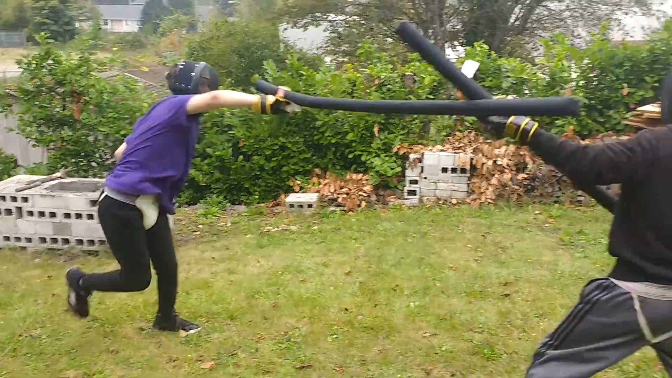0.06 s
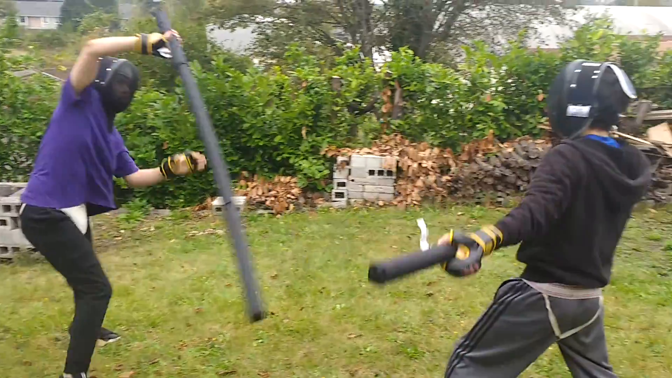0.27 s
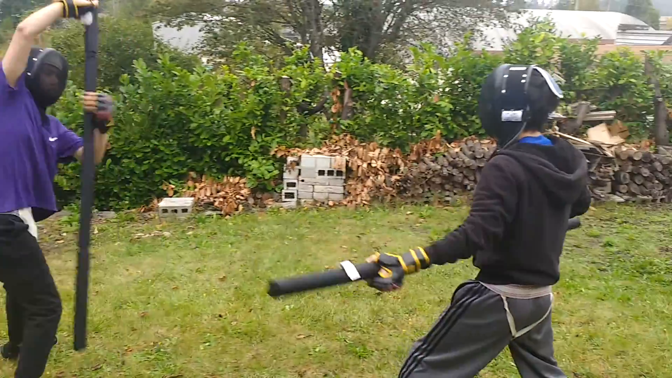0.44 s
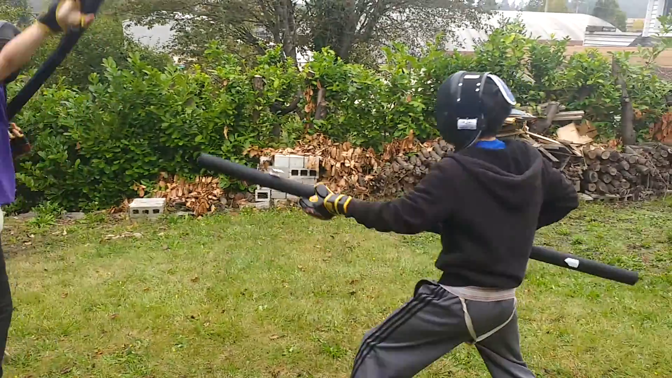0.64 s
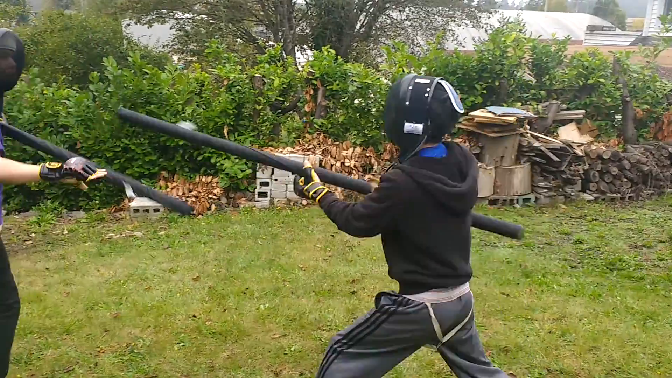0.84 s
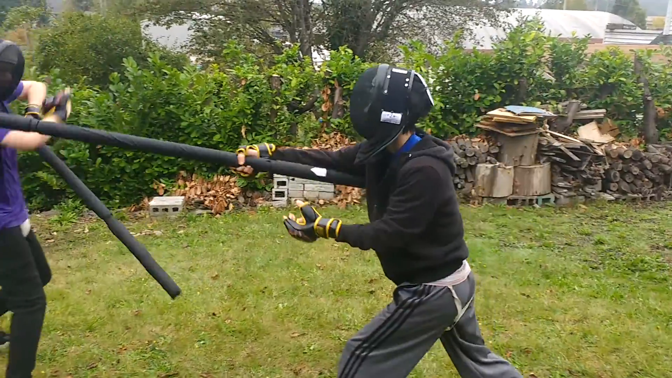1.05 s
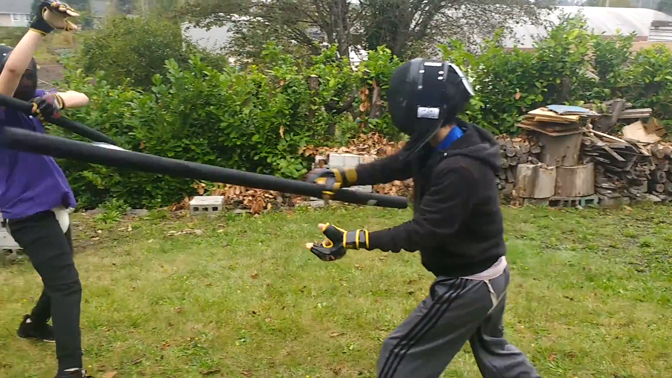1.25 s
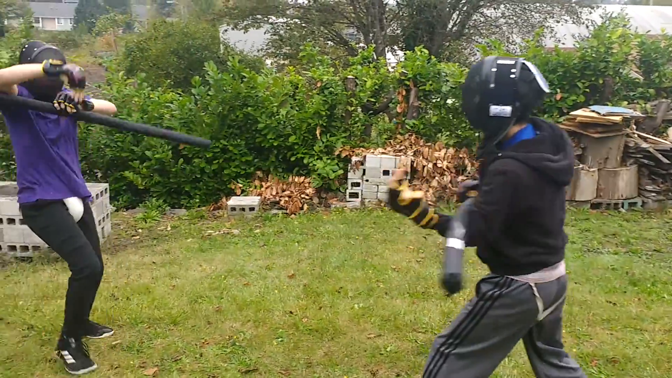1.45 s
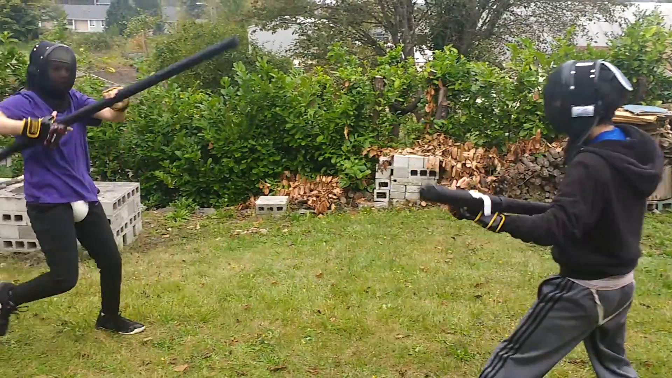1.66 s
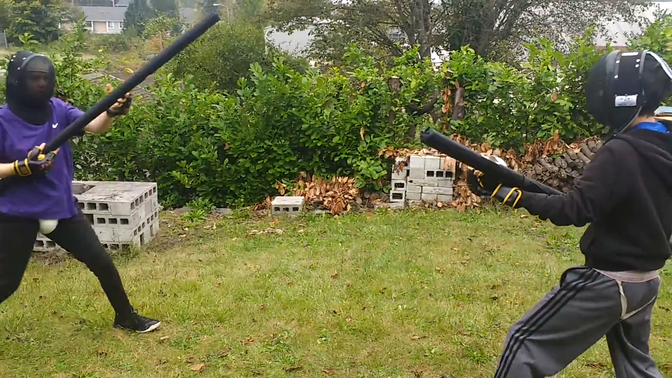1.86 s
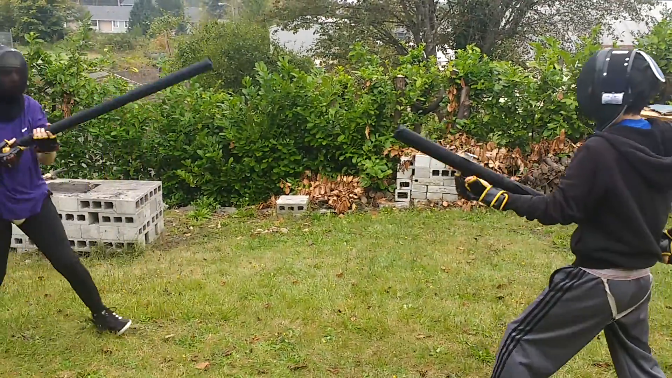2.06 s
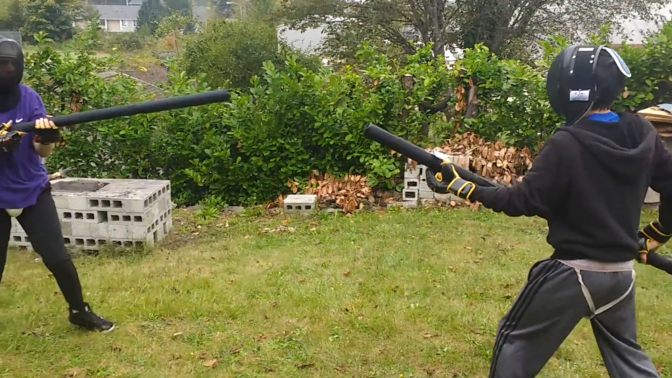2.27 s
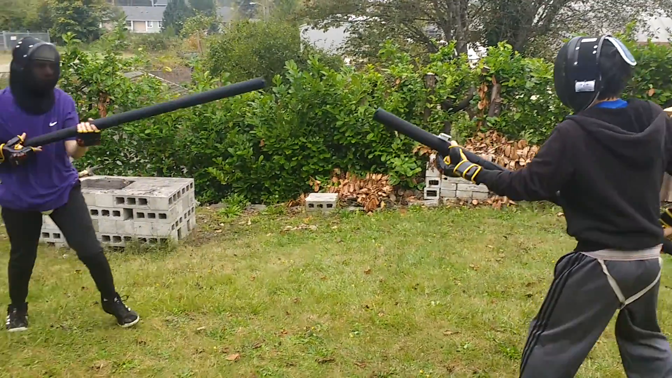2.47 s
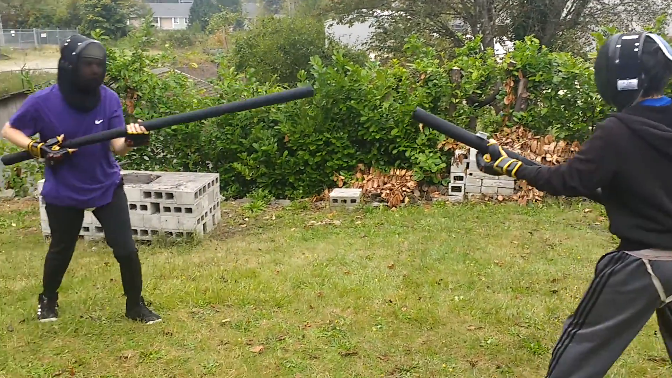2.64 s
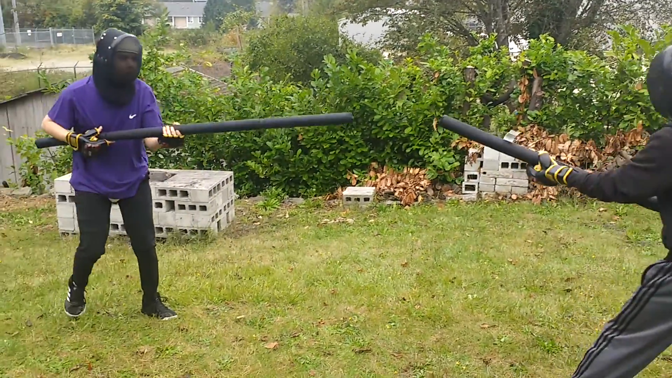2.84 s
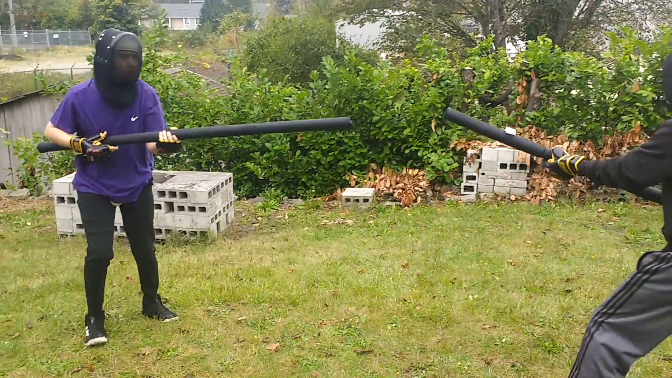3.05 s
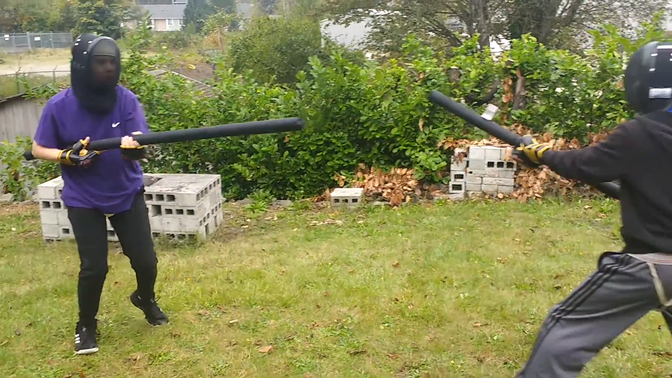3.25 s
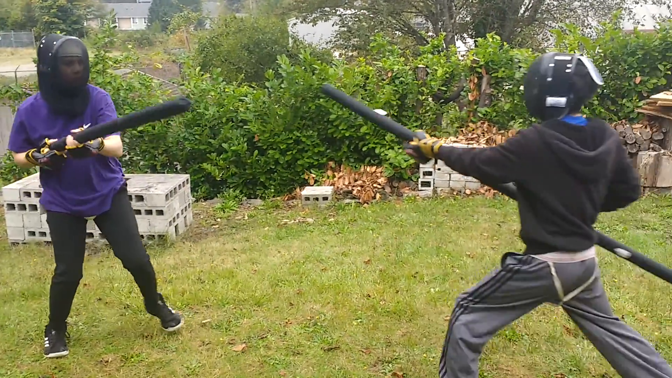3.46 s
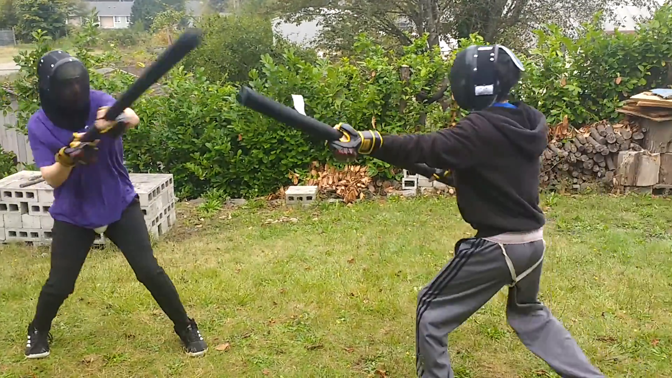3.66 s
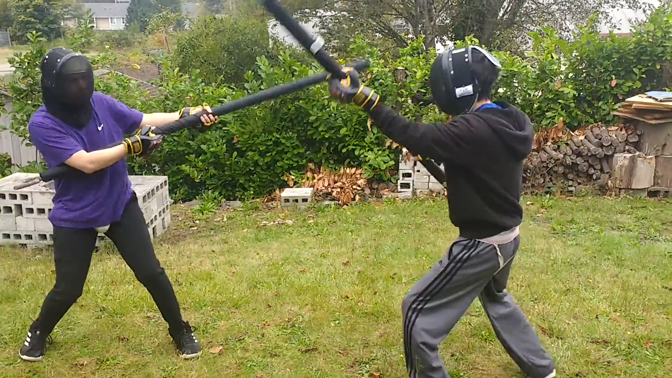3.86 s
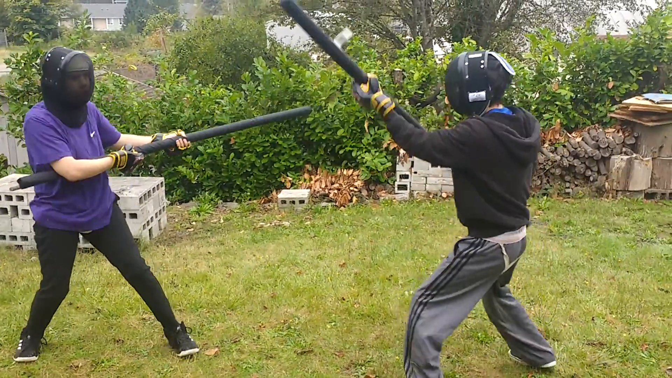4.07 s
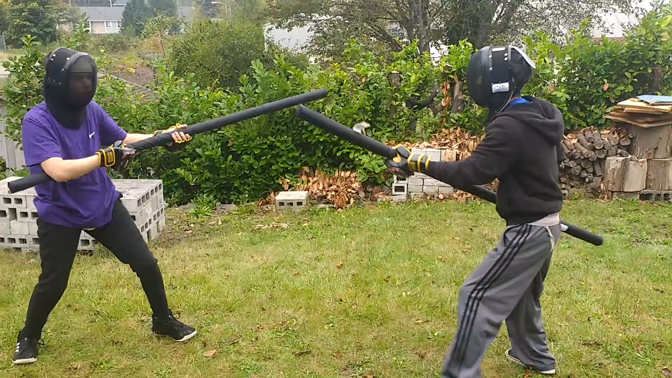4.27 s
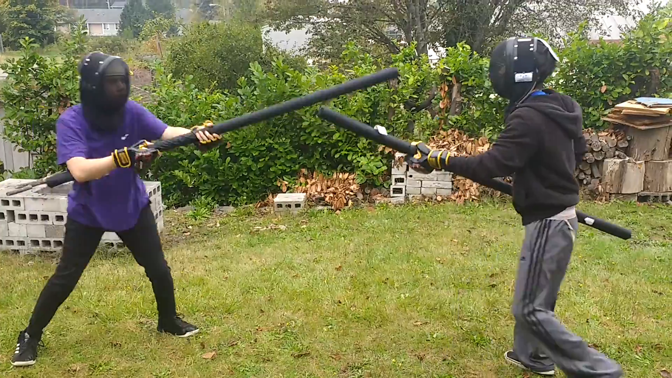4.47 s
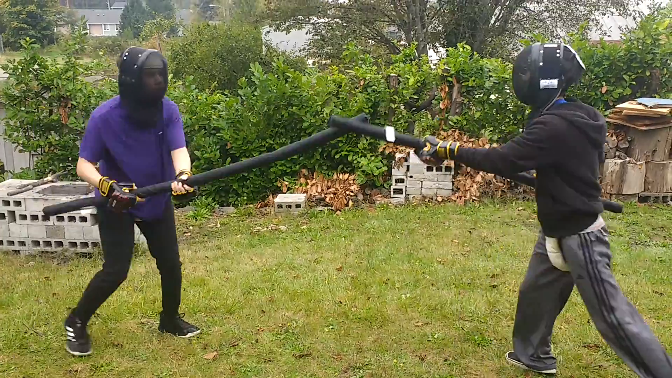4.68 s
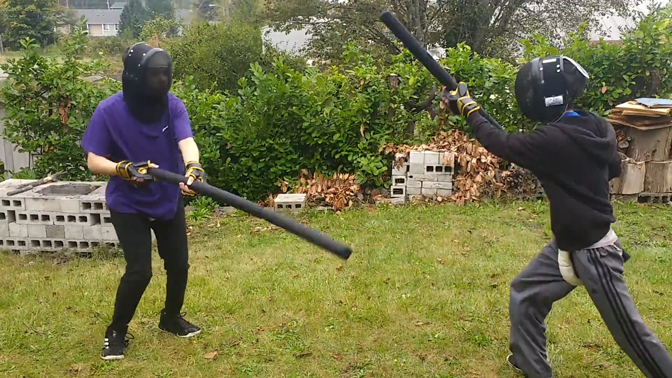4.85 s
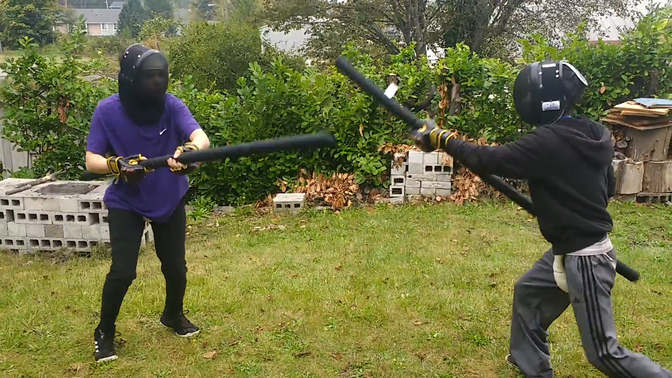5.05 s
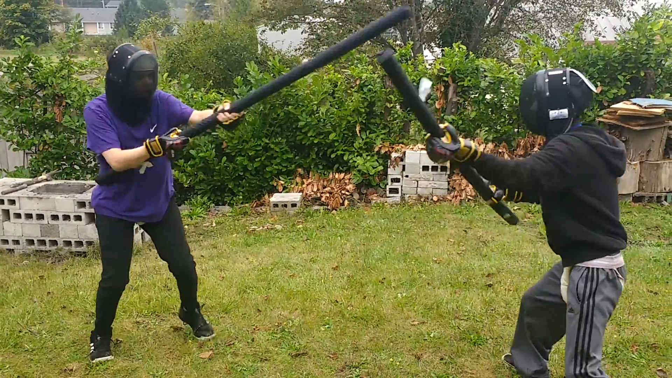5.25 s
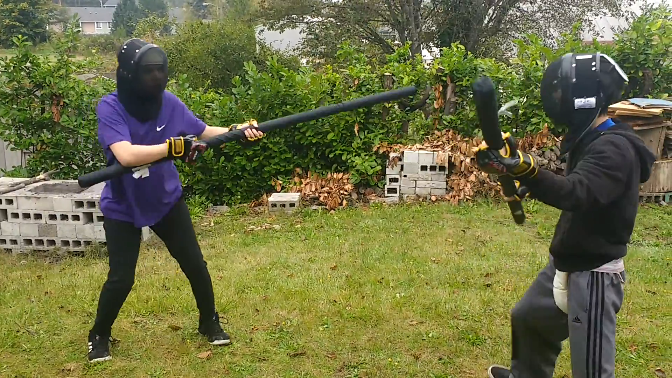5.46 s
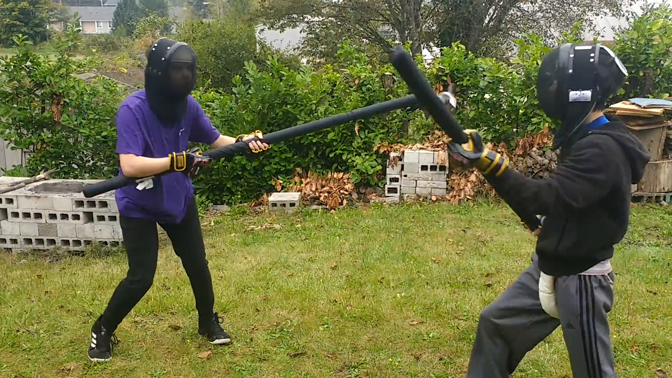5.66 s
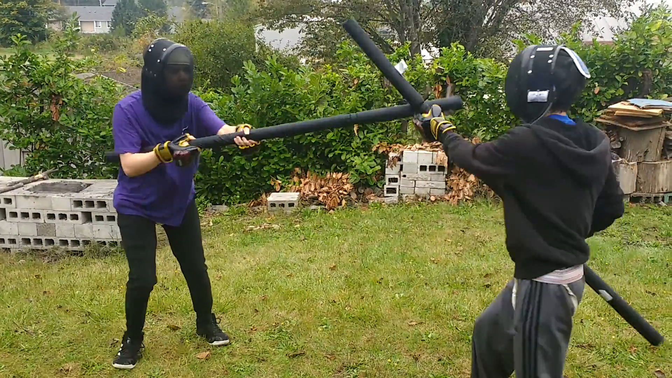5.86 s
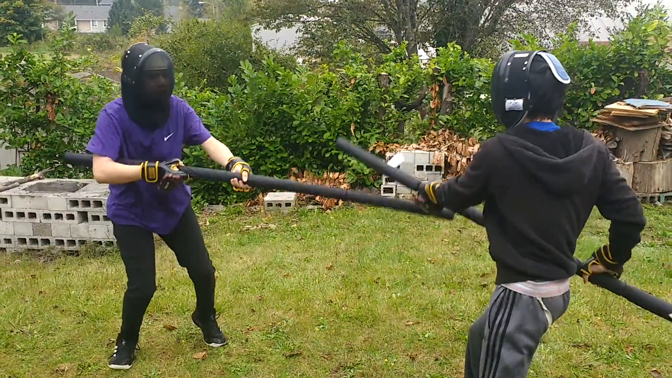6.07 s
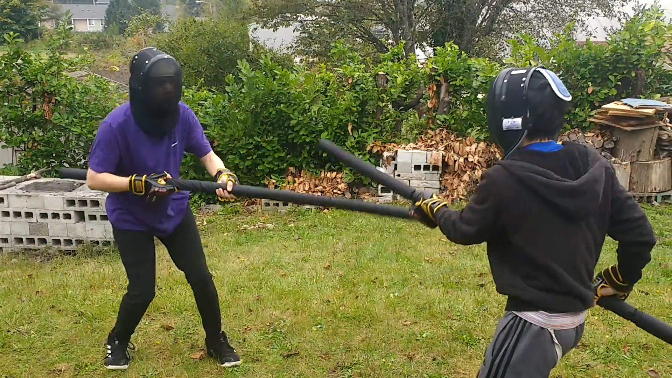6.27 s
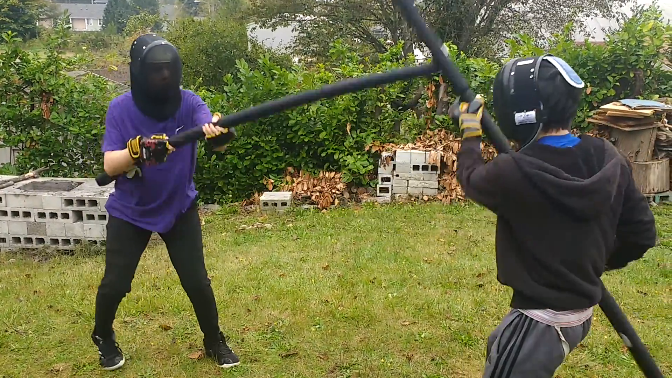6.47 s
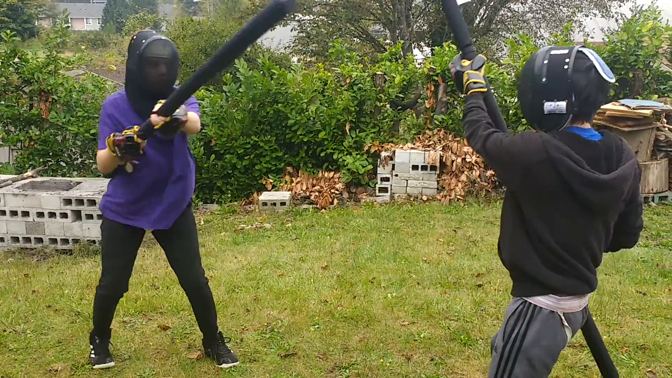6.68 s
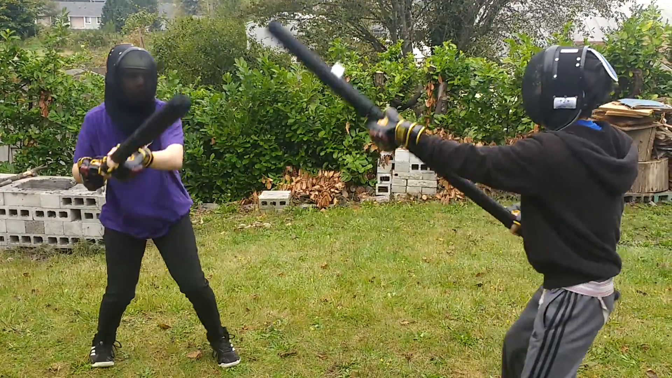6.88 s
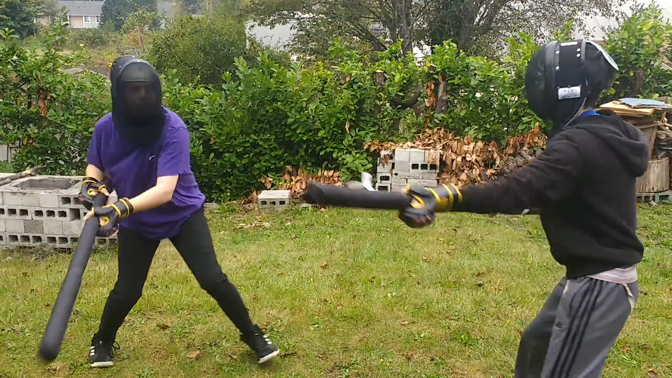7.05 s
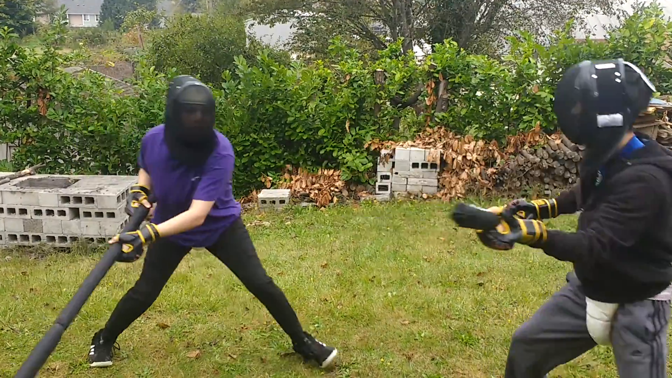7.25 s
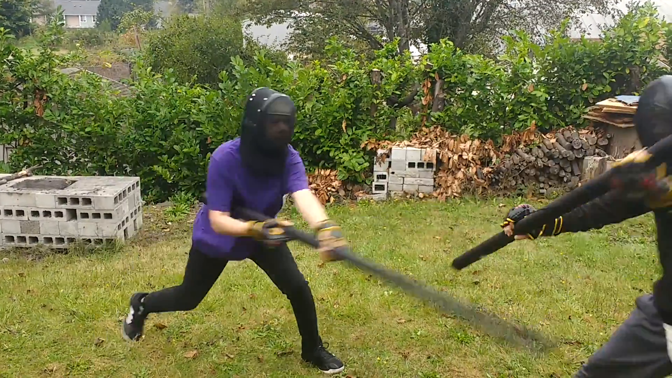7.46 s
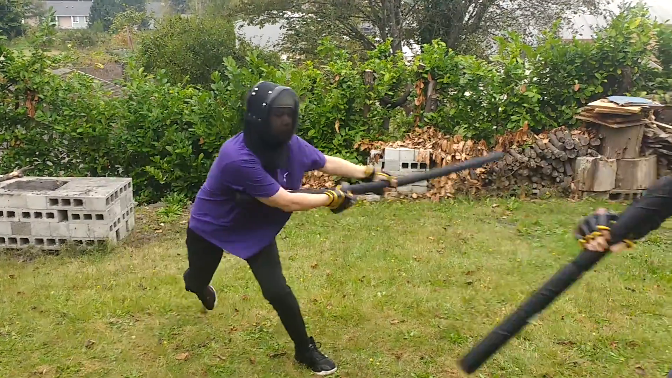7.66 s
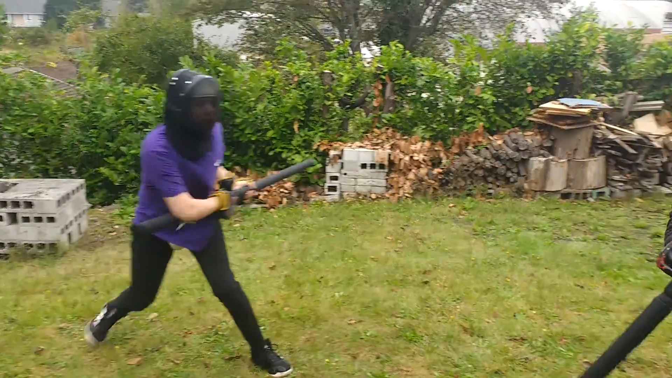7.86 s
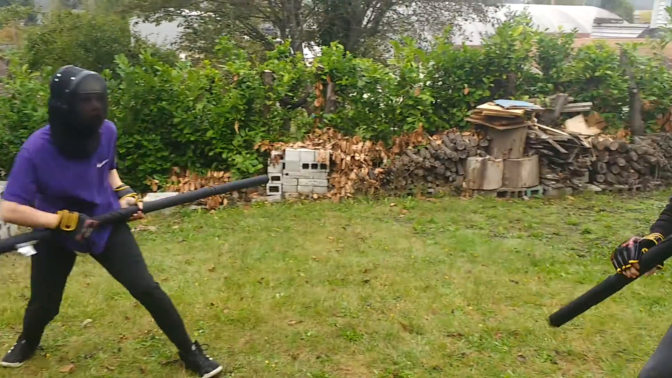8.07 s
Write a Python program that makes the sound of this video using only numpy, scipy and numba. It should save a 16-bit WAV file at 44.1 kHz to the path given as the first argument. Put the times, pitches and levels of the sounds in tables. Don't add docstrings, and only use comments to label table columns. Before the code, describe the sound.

A backyard bout with foam-padded poles, picked up by a phone a few metres away, with wide stereo and thin bass. Soft airy rubbing and rustling opens over a steady far-traffic roar; a faint wheezy bird calls at 0.6-0.9 s. A dull thud lands at 1.0 with a low foam squeak, then a harder knock at 1.2, after which the background dips and slowly returns. Tiny soft foam whoops come near 2.1 and 2.3. Bright tape and glove ticks cluster at 2.7-3.0, with sparser ones until 3.9. The bird calls most clearly at 4.2-4.5. Knocks follow at 4.6 and 5.2, then a loud deep double thud at 5.9. The bird answers at 6.0-6.3, weaker knocks fall at 6.45-6.65, cloth swishes, and the loudest ringing crack hits at 7.6, again ducking the background. Small taps fade out by 8 s.

```python
import sys
import numpy as np
from scipy import signal
from scipy.fft import rfft, irfft, next_fast_len
from scipy.io import wavfile
from scipy.ndimage import uniform_filter1d
from numba import njit

SR = 44100
rng = np.random.default_rng(int(sys.argv[2]) if len(sys.argv) > 2 else 0)


def linear_from_db(decibels):
    return 10 ** (np.asarray(decibels, float) / 20)


def log_audio(samples):
    frames = np.atleast_2d(samples).T
    limited = np.clip(frames, -1, 1)
    pcm = np.round(limited * 32767).astype(np.int16)
    wavfile.write(sys.argv[1], SR, pcm)


N = 358091
STEP = 32
TIME = np.arange(N // STEP + 1) * STEP / SR
SAMPLE_TIME = np.arange(N) / SR


@njit
def svf(x, hz, width):
    y, b, l = np.empty(len(x)), 0., 0.
    g, k = np.tan(np.pi * hz / SR), width / hz
    for i in range(len(x)):
        v = (b + g * (x[i] - l)) / (1 + g * (g + k))
        b, l, y[i] = 2 * v - b, l + 2 * g * v, k * v
    return y


def band(x, hz, width_hz):
    return svf(svf(x, 1. * hz, 1. * width_hz), 1. * hz, 1. * width_hz)


def unit(x):
    return x / np.sqrt(np.mean(x ** 2))


def on_log(hz, table):
    table_hz, values = np.transpose(table)
    return np.interp(np.log(hz), np.log(table_hz), values)


def curves(table):
    s, *columns = np.transpose(table)
    return [np.interp(TIME, s, c) for c in columns]


def full(control):
    return np.interp(SAMPLE_TIME, TIME, control)


def walk(rate):
    k = int(SR / STEP / rate)
    held = np.repeat(rng.standard_normal(len(TIME) // k + 1), k)
    return 1.3 * uniform_filter1d(uniform_filter1d(held, k), k)[:len(TIME)]


def seconds(length):
    return np.arange(int(length * SR)) / SR


def add(out, x, s):
    i = int(s * SR)
    out[:, i:i + x.shape[-1]] += x[..., :N - i]


# frequency in Hz, likeness from 0 to 1.
CHANNEL_LIKENESS = [(40, 0), (130, 0.58), (260, 0.58), (450, 0.21), (1000, 1), (1550, 0.67), (2050, 0.96),
                    (2700, 0.99), (3600, 1), (12000, 0.99)]


def pair(noise, hz, width_hz, db, count=0):
    alike = np.clip(on_log(hz, CHANNEL_LIKENESS), 0, 1)
    mid = np.sqrt(1 + alike) * band(noise[-count % 3], hz, width_hz)
    side = 0 * mid
    if alike < 1:
        side = np.sqrt(1 - alike) * band(noise[(1 - count) % 3], hz, width_hz)
    return np.array([mid + side, mid - side]) * (full(linear_from_db(db)) / np.sqrt(np.mean(mid ** 2 + side ** 2)))


# start in seconds, peak in dB, thud pitch in Hz, crack in dB over the knock,
# thud in dB over the pole's ring.
BLOWS = [(1.0231, -21, 297, -20, 15), (1.033, -18.5, 790, 1.5, -3), (1.233, -14.5, 254, -3.5, -0.5),
         (4.606, -13.5, 232, -5, -1), (4.6108, -22, 345, -22, -0.5), (5.2183, -17.5, 224, -9, -2),
         (5.9272, -9.5, 253, -15, 11), (5.9304, -7.5, 737, -12.5, 2), (6.4561, -21, 258, -11, -1.5),
         (6.5551, -24.5, 740, -6, -1), (7.5747, -5, 340, -8.5, -5), (7.6021, -24.5, 440, -9, -4),
         (7.709, -34.5, 367, -9, 3), (7.985, -39, 835, -27, 2), (6.634, -22.5, 343, -26, 9)]
# frequency in Hz, level in dB, 60 dB decay in seconds.
POLE_MODES = [(160.7, -14.5, 0.14), (363, -8, 0.12), (530, -7.5, 0.062), (734, -0.5, 0.038),
              (851, 4.5, 0.022), (1176, -3, 0.026), (1430, -8, 0.024), (2330, -1, 0.014), (2710, -7, 0.015)]


def knocks():
    out, t = np.zeros((2, N)), seconds(.12)
    modes_hz, modes_db, t60 = np.transpose(POLE_MODES)
    for s, peak_db, thud_hz, crack_db, thud_db in BLOWS:
        hz = modes_hz * (1 + 0.056 * rng.standard_normal(len(modes_hz)))
        gain = linear_from_db(modes_db + 3.2 * rng.standard_normal((2, len(hz))))
        ring = -gain @ (np.sin(2 * np.pi * hz[:, None] * t) * 1000 ** (-t / t60[:, None]))

        squash = 0.72 * np.exp(-(t * thud_hz / 1.18) ** 2) + 0.36 * np.exp(-t / 0.0067)
        thud = np.sin(2 * np.pi * thud_hz * t - .9) * squash
        thud_gain = linear_from_db(thud_db + np.array([[1.5], [-2.5]]))
        body = (ring / np.abs(ring).max() + thud_gain * thud) * (1 - np.exp(-t / 0.00024))

        crack = band(rng.standard_normal(len(t)), 2500, 10200)
        crack = crack * (2.4 * np.exp(-t / 0.0011) + 0.23 * np.exp(-t / 0.0026))

        bumps = np.repeat(rng.standard_normal(len(t) // 150 + 1), 150)[:len(t)]
        grit = rng.standard_normal(len(t)) * linear_from_db(2.5 * bumps)
        slide = unit(band(grit, 530, 3100)) * (t / .022) ** 0.99 * np.exp(1.5 - t / 0.013)

        blow = body / np.abs(body).max() + linear_from_db(crack_db - 6.0) * crack + linear_from_db(-29) * slide
        add(out, blow * linear_from_db(peak_db + 0.5), s)
    return signal.sosfilt(signal.butter(2, 110, "high", fs=SR, output="sos"), out)


# start in seconds, peak in dB, centre in Hz.
TOUCHES = [(0.5207, -46, 3020), (1.854, -33.5, 2810), (2.7274, -27, 3230), (2.7366, -33.5, 4430),
           (2.7416, -35, 4480), (2.7538, -28, 4660), (2.9472, -37, 2550), (2.97, -19.5, 2560),
           (2.9883, -16, 2500), (3.0024, -35, 2500), (3.0102, -23, 2720), (3.222, -26.5, 4630),
           (3.462, -30.5, 4860), (3.5525, -38.5, 4170), (3.8811, -33, 2800), (3.936, -28, 5630),
           (4.7082, -29, 4230), (5.2474, -20.5, 4500), (5.7837, -39, 2590), (6.35, -39.5, 7500),
           (6.355, -36.5, 4500), (6.3843, -28, 4400), (6.558, -37.5, 2870), (7.2509, -46, 2700),
           (7.5334, -38, 2600)]


def ticks():
    out, t = np.zeros((2, N)), seconds(.25)
    fade = 1.06 * np.exp(-t / 0.00035) + 0.29 * 1000 ** (-t / 0.022)
    for s, peak_db, hz in TOUCHES:
        snap = unit(band(rng.standard_normal(len(t)), hz, 0.95 * hz))
        add(out, linear_from_db(peak_db + 1.5) * snap * fade, s + 0.00064)
    return out


# start in seconds, length in seconds, start and end pitch in Hz, peak in dB.
AIR_WHOOPS = [
    (2.071, 0.026, 630, 738, -37),
    (2.093, 0.018, 816, 910, -34),
    (2.324, 0.015, 900, 755, -34),
    (4.018, .007, 795, 800, -30.5),
    (8.007, 0.01, 740, 710, -40.5),
]


def whoops():
    out = np.zeros((2, N))
    for s, length, start_hz, end_hz, db in AIR_WHOOPS:
        size = int(length * SR)
        tone = np.sin(2 * np.pi * np.cumsum(np.linspace(start_hz, end_hz, size)) / SR)
        add(out, linear_from_db(db) * tone * np.hanning(size) ** 0.36, s)
    return out


# start in seconds, length in seconds, centre in Hz,
# width as a share of the centre from 0 to 1, level in dB.
FOAM_SQUEAKS = [
    (.0, 0.2, 5030, 0.7, -37.5),
    (1.049, 0.025, 1275, 0.12, -29),
    (2.73, 0.013, 1290, 0.26, -31),
    (2.751, 0.014, 1300, 0.5, -31.5),
    (3.22, 0.18, 4700, 0.58, -36.5),
    (5.254, 0.032, 1150, 0.14, -28.5),
    (7.512, 0.084, 4120, 0.1, -50),
    (7.52, 0.046, 2420, 0.03, -40),
]


def squeaks():
    out = np.zeros((2, N))
    for s, length, hz, width, db in FOAM_SQUEAKS:
        size = int(length * SR)
        noise = rng.standard_normal(16384)[:size]
        squeak = unit(band(noise, hz, max(width, .05) * hz))
        grip = np.linspace(0, 1, size) ** 0.075 * np.linspace(1, 0, size) ** 0.93
        add(out, linear_from_db(db) * squeak * grip, s)
    return out


# start in seconds, level in dB,
# seconds to fade 10 dB, sheen above 6 kHz in dB, body near 1 kHz in dB.
CONTACT_SCRAPES = [(0, -43, .07, -3, -10), (1.029, -33, 0.07, -10, -19), (1.236, -36, 0.0328, -1.5, -1.5),
                   (2.73, -38.5, 0, -8.5, 1), (3.222, -48.5, .18, 1.5, -20), (3.463, -56, 0.35, -7, 4),
                   (3.883, -45, 0.11, -5, -3), (4.606, -39.5, 0.05, -2.5, 5.5),
                   (5.222, -36.5, 0.0829, -1, -1.5), (5.929, -31.5, 0.04, -17, 0),
                   (6.456, -44.5, .07, -4, -1), (6.648, -47.5, 0.02, -10, 2),
                   (7.579, -38.5, 0.06, -3.5, -10)]
# top in seconds, level in dB, seconds to fade 10 dB
# (negative: rise and fade trade places), sheen in dB, body in dB.
CLOTH_SWISHES = [(.15, -44.5, 0.05, -1.5, -6.5), (.33, -50.5, 0.32, -17, -9), (.6, -47.5, 0.13, 0, -8),
                 (.88, -50, 0.27, 1.5, -8.5), (.98, -43, 0.0758, -1.5, 7), (2.15, -47, 0.18, -5, -3),
                 (1.595, -56.5, 0.05, -8.5, -1.5), (1.762, -50, 0.08, -3, -9), (2.345, -48.5, 0.03, -9, -7),
                 (2.45, -57, .15, -16, -3), (2.87, -53.5, -0.24, -8, -12), (2.995, -35, .042, -8, -1),
                 (3.12, -53, 0.64, -10.5, -12), (4.3, -55, 0.65, -10, 4), (5.53, -54.5, -0.03, -1, 2),
                 (4.759, -48, 0.09, 8.5, -3.5), (4.87, -53, 0.57, -8.5, -0.5), (5.89, -52.5, 0.13, -11, 0),
                 (6.2, -54.5, 0.23, -12, -8), (6.55, -51, 0.09, 5, 1), (6.991, -47.5, 0.16, -10, -17),
                 (7.26, -54, 0.05, -10, -7), (7.52, -48.5, 0.13, -6.5, -8), (8.05, -69.5, 1, -4, -14.5)]


def rub_controls():
    rows = [(row, 0.00064) for row in CONTACT_SCRAPES]
    rows += [(row, 0.8 * row[2]) for row in CLOTH_SWISHES]
    power = []
    for (s, db, fade, _, _), rise in rows:
        fall = np.maximum((s - TIME) / rise, (TIME - s) / fade)
        power.append(linear_from_db(2 * (db - 10 * fall)))
    power.append(linear_from_db(2 * (-60.5 + .3 * duck_db())))
    power = np.array(power)
    colours = np.array([row[3:] for row, _ in rows] + [(-4.5, -6.5)])
    sheen_db, body_db = colours.T @ power / power.sum(0)
    return 10 * np.log10(power.sum(0)), sheen_db, body_db


def rustle():
    level_db, sheen_db, body_db = rub_controls()
    slips = linear_from_db(1.42 * np.repeat(rng.exponential(size=N // 40 + 1), 40)[:N])
    noise = slips * rng.standard_normal((3, N))
    bands = [(600, body_db - 6.0), (1000, body_db - 0.5), (1600, body_db / 2 + 3.0),
             (2400, 0.83), (3400, 0.47), (4700, sheen_db / 3 + 1.5), (6500, sheen_db * 1.26),
             (8500, sheen_db - 3.5), (11000, sheen_db - 8.0), (14000, sheen_db - 11.0)]
    out = 0
    for k, (hz, db) in enumerate(bands):
        out = out + pair(noise, hz, hz / 2, level_db + db + 1.8 * walk(25), count=k)
    return out


# share of the note from 0 to 1, fundamental in Hz, level in dB.
RISING_NOTE = [(0, 1470, -8), (.1, 1535, 0), (.45, 1620, -0.5), (.8, 1700, 3), (1, 1740, -10)]
ARCHING_NOTE = [(0, 1930, -9), (.1, 2080, -4), (.25, 2287, -1.5), (.5, 2290, -1), (.7, 2220, -6),
                (1, 2060, -12)]
# start in seconds, length in seconds, level in dB.
RISING_TIMES = [
    (.63, .18, -55),
    (4.171, .15, -50),
    (6.01, .14, -56),
]
ARCHING_TIMES = [
    (.815, 0.12, -46),
    (4.329, 0.15, -44),
    (6.184, .13, -48),
]


def bird():
    notes = []
    for shape, times in ((RISING_NOTE, RISING_TIMES), (ARCHING_NOTE, ARCHING_TIMES)):
        for s, length, db in times:
            notes.append((np.array(shape) * [length, 1, 1] + [s, 0, db]).tolist())
    notes.sort()
    hz, db = curves(np.concatenate(notes))
    on = sum((TIME > note[0][0]) & (TIME < note[-1][0]) for note in notes)

    phase = 2 * np.pi * np.cumsum(full(hz * (1 + .005 * walk(150)))) / SR
    overtones = ((2, 0.1), (3, 0.1), (4, -3.))  # harmonic, dB
    voice = sum(linear_from_db(k_db) * np.sin(k * phase) for k, k_db in overtones)
    breath = full(on * linear_from_db(db + 4.5) * (1 + .35 * walk(300)))
    out = breath * band(voice, 4550, 1350)

    t = seconds(.2)
    trees = rng.standard_normal(len(t)) * 1000 ** (-t / .16)
    return out + linear_from_db(0.5) * signal.oaconvolve(out, trees / np.linalg.norm(trees))[:N]


# frequency in Hz, level in dB per Hz.
ROAD_COLOUR = [(35, -36), (60, -3.5), (110, 2), (200, -2), (360, 0.5), (520, -4), (750, 2), (1100, -5),
               (1550, -22), (2200, -8.5), (4000, -36), (6500, -24), (10000, -39), (16000, -35)]
# time in seconds, roar in dB.
ROAD_ROAR = [(0, -41.5), (.18, -47), (.34, -43.5), (1.0, -44.5), (2.3, -45), (2.7, -46), (2.95, -45.5),
             (3.6, -47), (4.0, -46.5), (5.3, -46.5), (5.8, -45.5), (6.9, -47.5), (7.26, -48.5), (7.55, -44),
             (8.12, -44)]
# frequency in Hz, width in Hz, level in dB over the roar.
ENGINE_DRONE = [(112, 7, -13), (157, 5, -13), (360, 8, -17)]


def traffic():
    roar_db = curves(ROAD_ROAR)[0] + duck_db()
    rumble_db = roar_db - 5.5
    out, noise = 0, rng.standard_normal((3, N))
    for k, hz in enumerate(45 * 2 ** np.arange(0, 8.6, .5)):
        low = np.clip(np.log2(450 / hz), 0, 1)
        db = on_log(hz, ROAD_COLOUR) + 10 * np.log10(hz / 800)
        db = db + low * (rumble_db + 9.0) + (1 - low) * roar_db
        out = out + pair(noise, hz, hz / 2, db - 2.5 + 2.42 * walk(9), count=k)
    for hz, width_hz, db in ENGINE_DRONE:
        out = out + pair(noise, hz, width_hz, roar_db + db)
    return out


# start in seconds, depth in dB, hold in seconds.
GAIN_DUCKS = [
    (1.22, 9.5, .26),
    (5.9, 5.5, 0.32),
    (7.603, 15.5, .02),
]


def duck_db():
    attack_s, recover_db_per_s = 0.099, 13.5
    ducks = []
    for s, db, hold in GAIN_DUCKS:
        drop = db * (TIME - s) / attack_s
        recover = db - recover_db_per_s * (TIME - s - attack_s - hold)
        ducks.append(np.clip(np.minimum(drop, recover), 0, db))
    return -np.max(ducks, axis=0)


def scene():
    return knocks() + ticks() + whoops() + squeaks() + rustle() + bird() + traffic()


def top_cut(x):
    return signal.sosfilt(signal.butter(12, 16480, fs=SR, output="sos"), x)


# frequency in Hz, lag in radians.
LEFT_BASS_LAG = [(40, -2.6), (130, -.85), (260, -.45), (400, -.4), (600, .35), (900, 0.05)]


def record(dry):
    dry = [x - 0.21 * svf(x, 3730., 390.) for x in dry]
    size = next_fast_len(N + 4096)
    hz = np.maximum(np.arange(size // 2 + 1) * SR / size, 1)
    late = 2 * np.pi * hz / 1775 - np.pi
    lag = np.where(hz > LEFT_BASS_LAG[-1][0], late, on_log(hz, LEFT_BASS_LAG))
    left = irfft(rfft(dry[0], size) * np.exp(-1j * lag), size)[:N]
    wide = signal.sosfilt(signal.butter(2, 90, "high", fs=SR, output="sos"), [left, dry[1]])
    wide = signal.sosfilt(signal.cheby1(10, .5, 15300, fs=SR, output="sos"), wide)
    return top_cut(wide)


dry = scene()
out = record(dry)
log_audio(out)
```